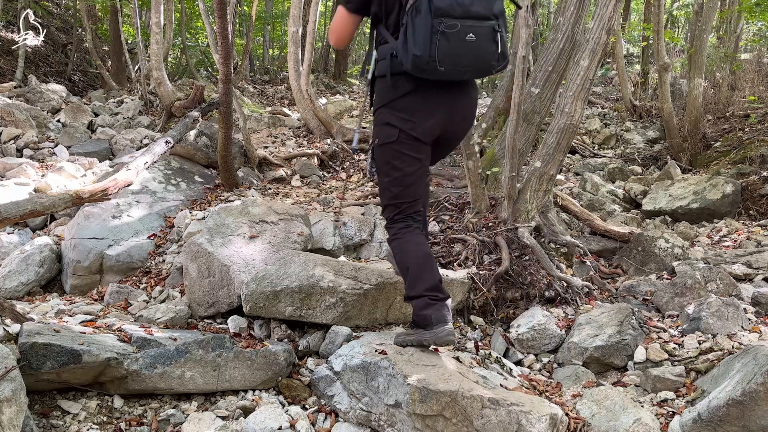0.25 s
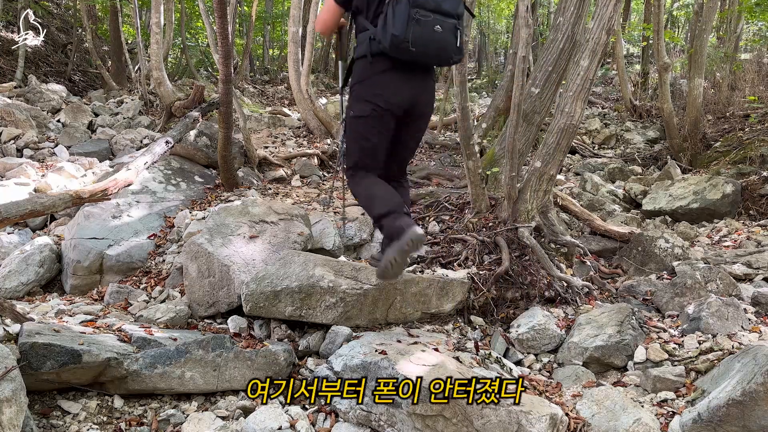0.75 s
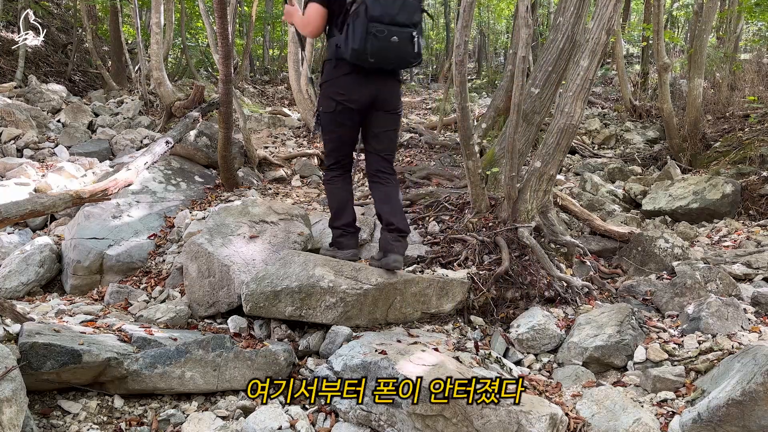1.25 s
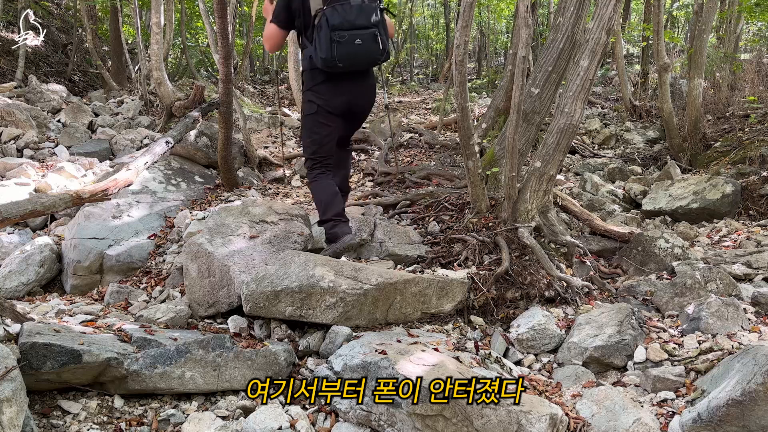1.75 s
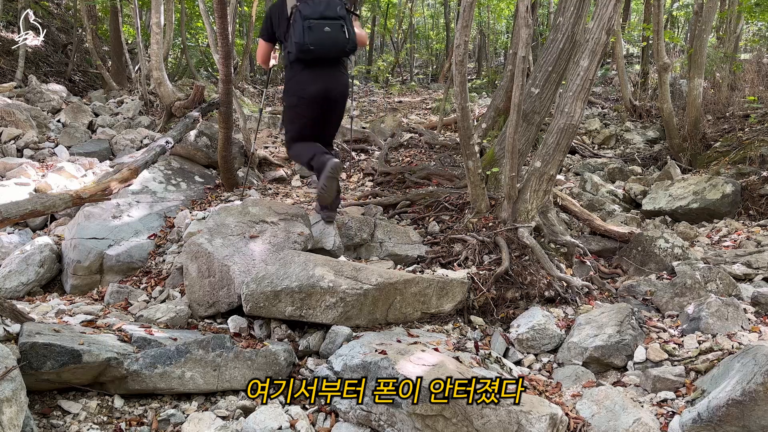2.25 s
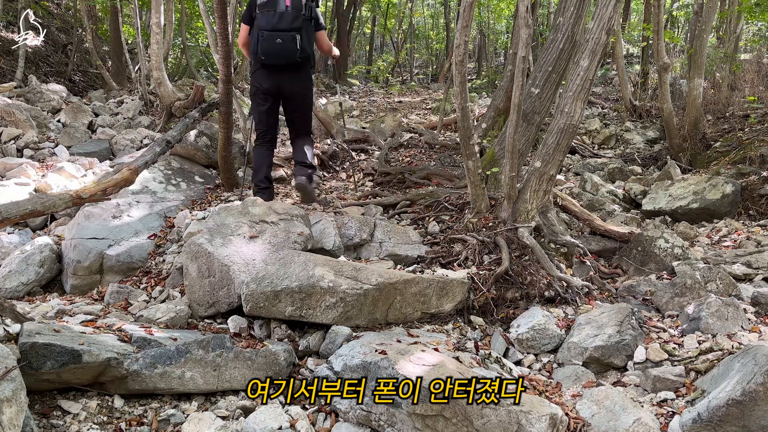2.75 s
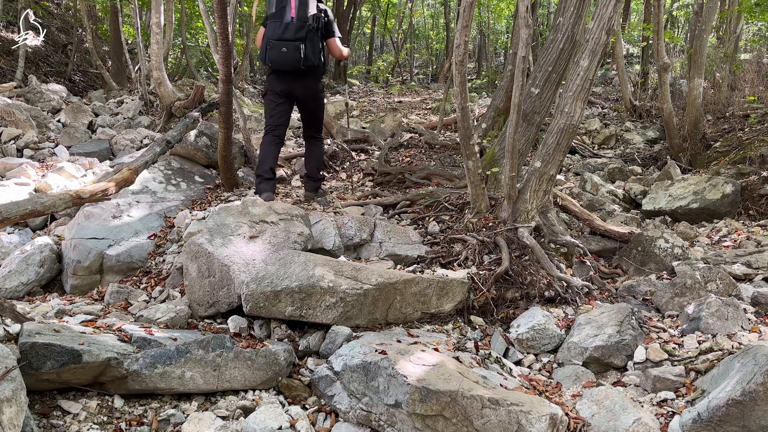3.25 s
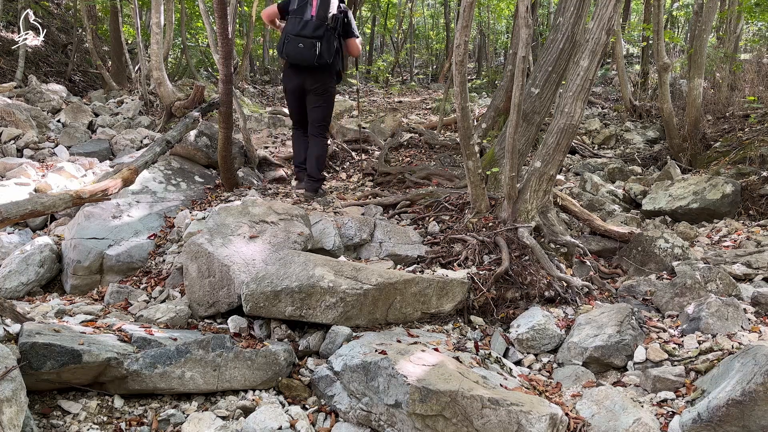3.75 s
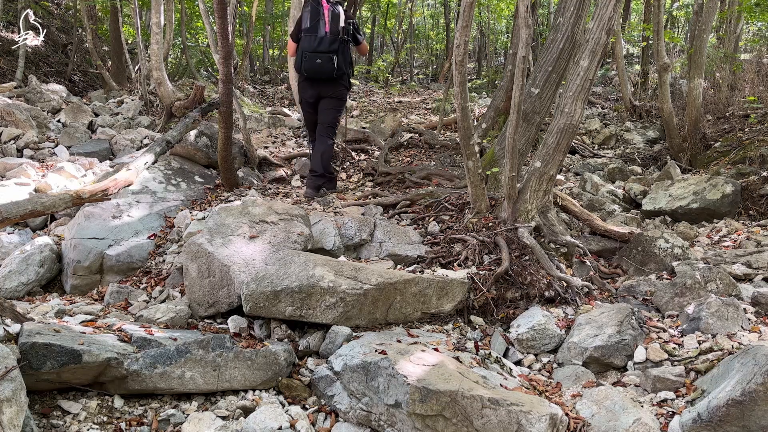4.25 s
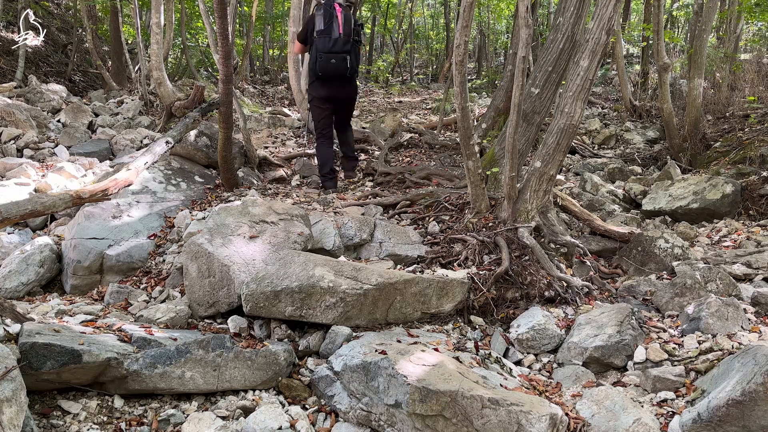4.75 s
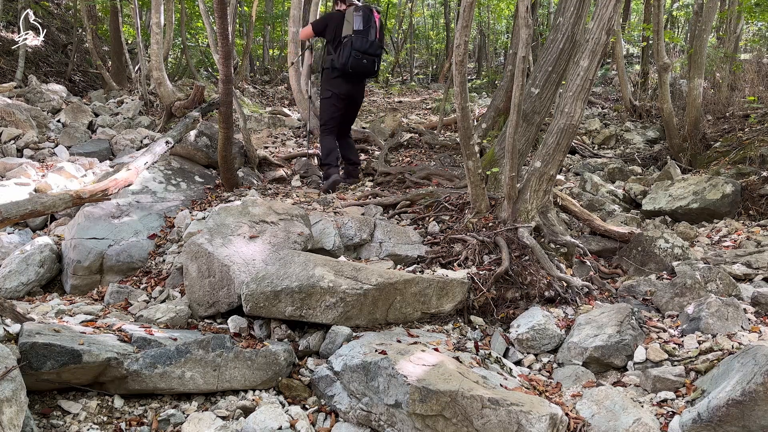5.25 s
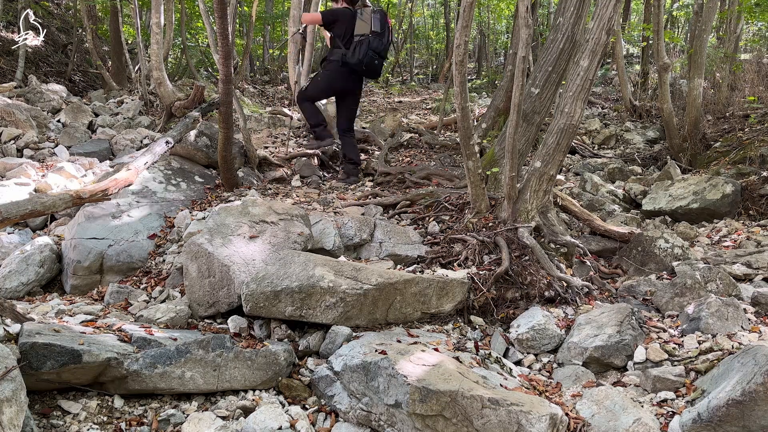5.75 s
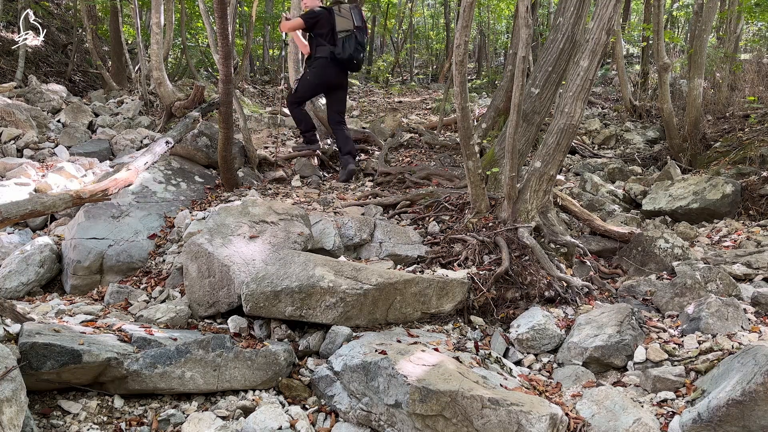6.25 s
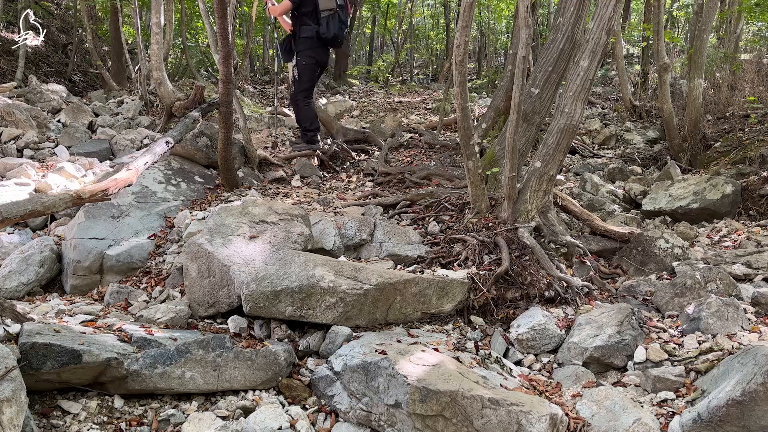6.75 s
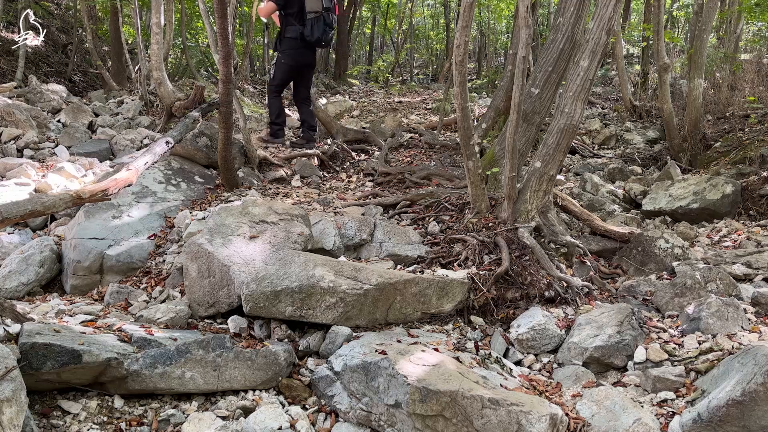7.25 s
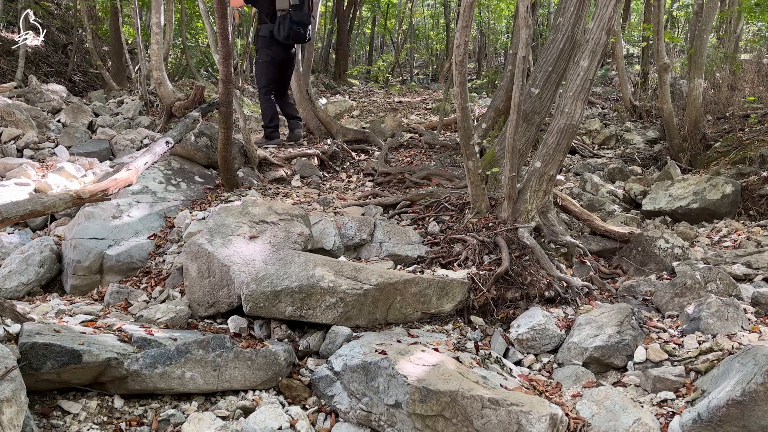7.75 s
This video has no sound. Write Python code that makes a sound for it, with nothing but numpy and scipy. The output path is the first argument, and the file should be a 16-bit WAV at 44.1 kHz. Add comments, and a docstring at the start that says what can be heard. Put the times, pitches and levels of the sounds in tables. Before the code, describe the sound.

Irregular steps on stony ground: dull boot thuds, short gritty scrapes, dry leaf rustling and small stone knocks. Metallic pole tips strike rock in bright clacks, single or in quick clusters, with a short hollow ring in the later ones. Tiny falling bird chips come from far away. The trees give a short airy tail; close stereo microphones add steady soft hiss and low rumble.

```python
"""Boots thud on stone and scuff grit and dry leaves while two trekking poles crack on loose rocks in a quiet forest.
Each crack is a noise burst that sets the hollow shaft ringing in decaying sines; thuds are falling sines with noise.
Scuffs are shaped grain noise, short noises swell in bands, pebbles tick as filtered noise, a far bird chips in slides.
Tree trunks scatter the cracks, ticks and chips into a short noise tail, over low rumble and microphone hiss.
Two close microphone ports hear it all, differing in phase and level by frequency."""
import sys
import numpy as np
from scipy import signal
from scipy.fft import rfft, irfft
from scipy.io import wavfile
from scipy.ndimage import uniform_filter1d

SR = 44100
rng = np.random.default_rng(int(sys.argv[2]) if len(sys.argv) > 2 else 0)


def wav_out(sig):
    """Save sig, one row per channel (or a flat mono array), as 16-bit PCM at SR to the path in sys.argv[1]."""
    wavfile.write(sys.argv[1], SR, np.round(np.clip(np.atleast_2d(sig).T, -1, 1) * 32767).astype(np.int16))


N = 353505  # length in samples


def amp(db):
    """Decibels to gain."""
    return 10 ** (np.asarray(db) / 20)


def rms_one(x):
    """Scale to unit rms."""
    return x / np.sqrt(np.mean(x ** 2) + 1e-20)


def at_hz(points, hz):
    """Read a table of (frequency, value) on a log-frequency axis."""
    p = np.array(points, float)
    return np.interp(np.log(hz + 1), np.log(p[:, 0] + 1), p[:, 1])


def add(out, start_s, sound):
    """Mix a sound in at a time."""
    i = round(start_s * SR)
    out[i:i + len(sound)] += sound[:N - i]


def dying(t, t60, rise_s):
    """Envelope with a short rise and an exponential fall of 60 dB in t60 seconds, 4 ms at least."""
    return amp(-60 * t / max(t60, .004)) * (1 - np.exp(-t / rise_s))


def band(x, order, edges_hz):
    """Butterworth band-pass."""
    return signal.sosfilt(signal.butter(order, edges_hz, "band", fs=SR, output="sos"), x)


def colour(x, spectrum):
    """Minimum-phase filter with the given spectrum, unit energy: nothing sounds early."""
    log_gain = np.log(amp(at_hz(spectrum, np.linspace(0, SR / 2, 2049))))
    cepstrum = irfft(log_gain)
    # Folding the cepstrum onto positive time makes the phase minimum.
    cepstrum[1:2048] *= 2
    cepstrum[2049:] = 0
    kernel = irfft(np.exp(rfft(cepstrum)))
    return signal.fftconvolve(x, kernel / np.sqrt(np.sum(kernel ** 2)))[:len(x)]


def drift(rate_hz):
    """Chance wandering with unit spread: low-passed noise, drawn every 40 samples."""
    r = np.exp(-80 * np.pi * rate_hz / SR)
    slow = signal.lfilter([1], [1, -2 * r, r * r], rng.standard_normal(N // 40 + 2002))[2000:]
    return np.interp(np.arange(N) / 40, np.arange(len(slow)), rms_one(slow))


# Pole tip on rock, levels before shaping:
# start_s, crack level_db, chatter t60_s, then level_db of the shaft's three low bending modes
POLE_BLOWS = [(1.044, -17, 0.047, -47, -50, -46.5), (2.076, -23.5, 0.045, -56, -56, -58),
              (2.1039, -16, 0.045, -68, -67, -65), (4.8208, -24, 0.11, -48.5, -48.5, -53),
              (5.4064, -19, 0.036, -47, -39.5, -42.5), (5.5151, -29, 0.13, -52, -41, -38.5),
              (5.6235, -37, 0.059, -80, -80, -71), (7.1387, -22, 0.078, -50.5, -44, -41),
              (7.1544, -22.5, 0.087, -49, -45, -49)]
# Colour of the crack: frequency_hz, relative level_db (per Hz)
CRACK_COLOUR = [(400, -2.5), (1000, -2), (2000, -5), (3600, 5), (5100, -1), (6500, 3.5), (9000, 0.5),
                (13000, -4), (16000, -2.5)]
# Low bending modes of the shaft, their strength set by the blow: pitch_hz, t60_s
SHAFT_LOW_MODES = [(279.4, 0.52), (414.6, 0.36), (621, 0.2)]
# Upper shaft modes, before chance per blow: pitch_hz, level_db (against the crack), t60_s
SHAFT_UPPER_MODES = [(793, -37, 0.1), (1008, -29, 0.17), (1850, -23, 0.082), (2570, -27, 0.053),
                     (2850, -23, 0.09), (3240, -30, .045), (3700, -36, 0.06)]
SHAFT_SHIFT = 0.022  # grip and lean detune the upper modes from blow to blow (share of pitch)


def poles():
    """The tip chatters on the rock for some milliseconds; the shaft rings on in its bending modes.
    Also returns each blow as one click of equal energy, to excite the scatter."""
    cracks, blows, rings = np.zeros(N), np.zeros(N), np.zeros(N)
    t = np.arange(SR) / SR
    noise = rng.standard_normal((len(POLE_BLOWS), 4096))
    luck = rng.standard_normal((len(POLE_BLOWS), len(SHAFT_UPPER_MODES)))
    for (start_s, crack_db, t60, *low_db), hiss, chances in zip(POLE_BLOWS, noise, luck):
        t_crack = t[:len(hiss)]
        skip = 0.64 + 0.11 * np.cos(2 * np.pi * 190 * t_crack)  # the tip rebounds every few ms
        contact = dying(t_crack, t60, 0.00057) + 1.57 * dying(t_crack, 0.0021, .0001)
        crack = amp(crack_db) * hiss * skip ** 2 * contact
        add(cracks, start_s, crack)
        add(blows, start_s, np.sqrt([np.sum(crack ** 2)]))
        modes = [(hz, db, ring_t60) for (hz, ring_t60), db in zip(SHAFT_LOW_MODES, low_db)]
        for (hz, db, ring_t60), chance in zip(SHAFT_UPPER_MODES, chances):
            modes.append((hz * (1 + SHAFT_SHIFT * chance), crack_db + db + 3.9 * chance, ring_t60))
        for hz, db, ring_t60 in modes:
            add(rings, start_s, amp(db) * np.sin(2 * np.pi * hz * t) * dying(t, ring_t60, 3.3 / hz))
    rings = rings * amp(2.5 * drift(79))  # the level flutters fast, by chance, for a rougher tone
    return colour(cracks, CRACK_COLOUR), colour(blows, CRACK_COLOUR), rings


# Boot landing its weight: start_s, level_db (of the sine, before its envelope), settling pitch_hz, t60_s
BOOT_LANDINGS = [(0.403, -30, 59, 0.18), (0.516, -31.5, 54.5, 0.12), (1.172, -31, 65.5, 0.16),
                 (1.894, -31.5, 57.6, 0.12), (2.059, -44, 70.4, 0.47), (2.14, -34, 73.4, 0.25),
                 (2.171, -30, 66.5, 0.13), (2.504, -24, 88, 0.13), (2.549, -38, 62.4, 0.2),
                 (3.041, -45.5, 76, 0.14), (3.113, -29.5, 59.4, 0.18), (3.118, -30, 93.5, 0.04),
                 (4.203, -46.5, 92, 0.1), (4.851, -33, 80.5, 0.094), (6.745, -29.5, 70.3, 0.11),
                 (6.773, -28, 60.4, 0.12), (7.285, -45, 67.6, 0.56), (7.348, -40, 66.7, 0.23),
                 (7.654, -42, 102.6, 0.14)]


def thuds():
    """The sole flattens on the rock: the pitch drops to a low wobble, roughened by shifting ground."""
    out, t = np.zeros(N), np.arange(SR // 2) / SR
    noise = rng.standard_normal((len(BOOT_LANDINGS), len(t)))
    for (start_s, db, hz, t60), hiss in zip(BOOT_LANDINGS, noise):
        pitch = hz * (1 + 1.28 * np.exp(-t / 0.0097))
        rough = rms_one(band(hiss, 2, [hz * .5, hz * 2.4]))
        push = np.sin(2 * np.pi * np.cumsum(pitch) / SR) + 0.55 * rough
        add(out, start_s, amp(db) * push * dying(t, t60, 0.0079))
    return out


def grains(spectrum, per_s, spread_db, flutter_db, cycles, hiss):
    """Breaks of uneven size, each ringing some cycles at its own pitch, over a hiss of sliding, in clumps."""
    size = amp(spread_db * np.minimum(rng.exponential(1, N), 4)) * rng.choice([-1, 1], N)
    clicks = size * (rng.random(N) < per_s / SR) + 1e-18
    dealt = rng.integers(0, 16, N)  # which of 16 pitches each break rings at
    breaks = 0
    for k, hz in enumerate(np.geomspace(spectrum[0][0], spectrum[-1][0], 16)):
        r = amp(-60 * hz / (cycles * SR))
        w = 2 * np.pi * hz / SR
        ringing = signal.lfilter([1, 0, -1], [1, -2 * r * np.cos(w), r * r], clicks * (dealt == k))
        breaks = breaks + np.sqrt(hz) * rms_one(ringing)
    ground = colour(rms_one(breaks) + hiss * rng.standard_normal(N), spectrum)
    return rms_one(ground * amp(flutter_db * drift(21.5)))


# Colours of the ground, three tables alike: frequency_hz, relative level_db (per Hz)
GRIT_COLOUR = [(900, -12.5), (1800, -5), (3000, -1), (5000, -3), (7000, -8), (9000, -3.5), (12000, -10)]
LEAF_COLOUR = [(4000, -22), (7000, -6), (8500, -6.5), (10000, -8.5), (13000, -5.5), (16000, -13)]
STONE_COLOUR = [(60, 9.5), (150, -8), (400, 1.5), (1000, -4.5), (2000, -10), (4000, -44.5)]
# A boot drags through the litter:
# start_s, length_s, grit scuff level_db, fine leaf rustle level_db, grinding stones level_db
BOOT_DRAGS = [(-.04, 0.14, -58.5, -60, -61.5), (0.066, 0.56, -66, -68.5, -63.5),
              (0.388, 0.06, -57.5, -56, -51.5), (0.59, 0.056, -82, -72, -66),
              (0.762, 0.27, -65, -62.5, -67), (1.164, 0.088, -57.5, -56.5, -64.5),
              (1.308, 0.1, -64, -62, -67.5), (1.587, 0.39, -74.5, -75, -69.5),
              (1.924, 0.11, -59, -64.5, -53), (2.075, 0.013, -40, -70, -43.5),
              (2.242, 0.23, -60.5, -64, -60), (2.491, 0.065, -48.5, -52, -49), (2.768, 0.1, -64, -57, -71),
              (2.934, 0.17, -69.5, -64, -61.5), (3.046, 0.096, -58, -55.5, -75),
              (3.212, 0.035, -61, -57.5, -54), (3.644, 0.022, -70, -66, -71), (4.132, 0.12, -58, -52, -59),
              (4.297, 0.21, -61.5, -59, -64.5), (4.598, 0.013, -67, -58, -64),
              (4.93, 0.28, -72.5, -61.5, -66.5), (5.09, 0.24, -62, -61, -69),
              (5.526, 0.11, -59.5, -65, -61.5), (5.855, 0.45, -73, -62.5, -73.5),
              (6.137, 0.26, -65, -59, -67), (6.343, 0.22, -64.5, -58, -72.5),
              (6.733, 0.018, -52, -46.5, -50.5), (6.892, 0.011, -75, -52, -62),
              (7.114, 0.1, -53, -77, -56.5), (7.392, 0.22, -67.5, -60.5, -72),
              (7.878, 0.051, -74.5, -61.5, -75)]
# The sole bears down, slower in long drags (share of length); the litter settles after it lifts.
DRAG_ATTACK_S, DRAG_SWELL, DRAG_RELEASE_DB_PER_S = 0.021, .25, 112


def scuffing():
    """Each drag presses, holds and lets go; it stirs grit, leaves and stones in its own proportion."""
    start_s, length_s, *levels = np.transpose(BOOT_DRAGS)
    length_s = length_s[:, None]
    coarse = np.arange(0, N, 64)
    since = coarse / SR - start_s[:, None]
    bear_down = np.clip(since / (DRAG_ATTACK_S + DRAG_SWELL * length_s), 0, 1)
    press = bear_down * amp(-DRAG_RELEASE_DB_PER_S * np.maximum(since - length_s, 0))
    # Overlapping drags add in power.
    grit, leaves, stones = [np.interp(np.arange(N), coarse, np.sqrt(amp(db) ** 2 @ press ** 2))
                            for db in levels]
    return (grit * grains(GRIT_COLOUR, 3000, spread_db=2.0, flutter_db=2.0, cycles=24, hiss=1.0)
            + leaves * grains(LEAF_COLOUR, 5000, spread_db=3.5, flutter_db=3.0, cycles=42, hiss=1.0)
            + stones * grains(STONE_COLOUR, 1500, spread_db=1.5, flutter_db=2.5, cycles=11.7, hiss=0.88))


# Short swelling noises: broad ones like sole scrapes, narrow ones whistly, of unknown source.
# start_s, level_db (before the envelope), centre_hz, width_octaves, length_s
SHORT_SCRAPES = [(0.26, -65, 4530, 0.6, 0.037), (0.395, -43.5, 3600, 1.05, 0.011),
                 (0.471, -57, 2950, 1.9, 0.043), (0.841, -59.5, 2260, 1.9, 0.095),
                 (1.291, -59.5, 1860, 1.5, 0.19), (2.495, -37, 3480, 3, 0.042),
                 (2.781, -54.5, 3100, 3.6, 0.054), (4.451, -45, 8200, 5.8, 0.045),
                 (6.365, -59, 3380, 0.52, .04), (6.435, -62, 3240, 0.23, 0.044),
                 (6.486, -51, 3340, 0.25, 0.011), (6.494, -60, 3200, 0.3, 0.063),
                 (3.145, -61.5, 5200, 0.4, 0.036), (6.471, -62, 5030, 0.17, 0.16),
                 (6.555, -51.5, 4400, 2.5, 0.061), (6.729, -52.5, 5900, 1.4, 0.09),
                 (7.108, -43, 4960, 3.7, 0.084)]


def short_scrapes():
    """Uneven noise that swells and stops inside its own band: broad bands scrape, narrow ones whistle."""
    out, t = np.zeros(N), np.arange(SR // 2) / SR
    shape = (len(SHORT_SCRAPES), len(t))
    noise = rng.standard_normal(shape) * amp(4.6 * np.minimum(rng.exponential(1, shape), 4))
    for (start_s, db, hz, octaves, length_s), rough in zip(SHORT_SCRAPES, noise):
        edges = np.clip(hz * 2 ** (np.array([-.5, .5]) * max(octaves, .1)), 100, 19000)
        banded = rms_one(band(rough, 2, edges))
        swell = 1 - np.exp(-t / (0.084 * length_s))
        add(out, start_s, amp(db) * banded * np.exp(-(t / length_s) ** 3) * swell)
    return out * amp(1.33 * drift(98))


# Pebbles and twigs: start_s, level_db (loudest 2 ms), pitch_hz, t60_s
PEBBLE_TICKS = [(0.398, -33.5, 490, 0.027), (0.491, -48.5, 517, 0.082), (0.633, -57, 900, 0.024),
                (1.163, -48, 500, 0.058), (1.893, -50, 760, 0.033), (2.058, -28.5, 490, 0.023),
                (2.161, -43, 820, 0.035), (2.396, -47.5, 1740, 0.04), (2.438, -52, 1700, 0.028),
                (2.463, -53, 1900, 0.048), (2.503, -30, 730, 0.049), (2.516, -30.5, 535, 0.051),
                (2.839, -55, 3280, 0.065), (3.033, -46.5, 770, 0.029), (3.093, -48, 740, 0.092),
                (3.114, -43, 1050, 0.025), (3.287, -48, 6920, 0.013), (3.31, -52, 6460, 0.015),
                (3.346, -52, 9200, 0.015), (4.152, -54, 575, 0.033), (4.221, -49, 586, 0.032),
                (4.461, -52, 5600, 0.017), (5.147, -45.5, 2400, 0.022), (5.315, -57, 6790, 0.016),
                (5.383, -38, 10000, 0.012), (5.595, -54, 900, 0.088), (2.08, -28, 3500, 0.022),
                (4.483, -47, 6030, 0.0087), (6.208, -45.5, 2100, 0.032), (6.529, -47, 5100, 0.0061),
                (6.765, -40.5, 4000, 0.019), (6.8, -45, 640, 0.012), (6.882, -64, 1070, 0.025),
                (6.919, -41, 3180, 0.0065), (5.225, -56, 1100, .02), (6.78, -45, 895, .015),
                (7.242, -49.5, 4360, 0.027), (7.288, -56, 900, 0.018), (7.358, -56, 347, 0.035),
                (7.659, -43.5, 3570, 0.02)]


def ticks():
    """A pebble or twig gives a short noisy knock around its own pitch."""
    out, t = np.zeros(N), np.arange(4096) / SR
    noise = rng.standard_normal((len(PEBBLE_TICKS), len(t)))
    for (start_s, db, hz, t60), hiss in zip(PEBBLE_TICKS, noise):
        # a sharp first contact over the rattle
        contact = dying(t, t60, 0.00066) + 0.48 * dying(t, 0.0032, .0001)
        knock = band(hiss * contact, 3, [hz * 0.266, min(hz * 1.95, .45 * SR)])
        loudest = np.sqrt(np.max(uniform_filter1d(knock ** 2, size=88)))
        add(out, start_s, amp(db) * knock / loudest)
    return out


# A small bird's falling chip: start_s, level_db (before the mix), starting pitch_hz of the fundamental
BIRD_CHIPS = [(2.402, -56, 3520), (3.224, -49, 3610), (3.388, -51.5, 3460), (5.265, -48, 3630),
              (6.573, -49.5, 3570), (6.934, -52, 3550)]


def bird():
    """Each chip slides down within 15 ms; the octave is stronger than the fundamental."""
    out, t = np.zeros(N), np.arange(2048) / SR
    progress = np.clip(t / 0.015, 0, 1)
    shape = np.sqrt(np.sin(np.pi * progress) + 1e-9)
    for start_s, db, hz in BIRD_CHIPS:
        phase = 2 * np.pi * np.cumsum(hz * (1 - 0.275 * progress ** 2.22)) / SR
        add(out, start_s, amp(db) * shape * (np.sin(2 * phase) + 0.15 * np.sin(phase)))
    return out


TRUNKS_DB, TRUNKS_T60_S, TRUNKS_HZ = -7.5, 0.46, (1600, 8800)  # level, decay, band edges


def trunks(x):
    """Scatter from many trunks: a noise tail that dies away."""
    t = np.arange(SR) / SR
    tail = rng.standard_normal(SR) * dying(t, TRUNKS_T60_S, 0.00053)
    tail = band(tail, 1, TRUNKS_HZ)
    return amp(TRUNKS_DB) * signal.fftconvolve(x, tail / np.sqrt(np.sum(tail ** 2)))[:N]


# Low rumble plus microphone hiss with a bump near 8.5 kHz: frequency_hz, relative level_db (per Hz)
FLOOR_COLOUR = [(25, -21.5), (45, 2.5), (65, 2.5), (120, -5), (400, -13.5), (1200, -22.5), (4500, -31),
                (7000, -18), (8500, -7.5), (11000, -29), (16000, -33)]
FLOOR_DB = -61


def background_noise():
    """Steady low rumble plus microphone hiss: coloured noise whose level drifts very slightly."""
    return amp(FLOOR_DB + 0.094 * drift(1.3)) * colour(rng.standard_normal(N), FLOOR_COLOUR)


def spread(hits, chips):
    """The part that differs between the ports; each call is an unrelated draw."""
    scatter = trunks(hits + amp(10) * chips)  # the far bird is mostly scatter
    return scuffing() + short_scrapes() + background_noise() + scatter


# Likeness of the diffuse field at the two ports: frequency_hz, common share (0 to 1)
PORT_LIKENESS = [(60, 0.97), (200, 0.6), (500, 0.78), (1300, 0.09), (2200, 0.92), (4000, 0.5), (6500, 0.29),
                 (8000, 1), (14000, 0.92)]


def scene():
    """Direct hits plus a diffuse field that is partly common to both ports."""
    (cracks, blows, rings), pebbles, chips = poles(), ticks(), bird()
    direct = rfft(cracks + rings + pebbles + thuds() + amp(-1) * chips)
    alike = np.clip(at_hz(PORT_LIKENESS, np.arange(len(direct)) * SR / N), 0, 1)
    common = np.sqrt((1 + alike) / 2) * rfft(spread(blows + pebbles, chips))
    apart = np.sqrt((1 - alike) / 2) * rfft(spread(blows + pebbles, chips))
    return irfft([direct + common + apart, direct + common - apart], N)


# Phase between the microphone ports: frequency_hz, left port's lead_rad
PHASE_LEAD = [(0, 0), (1500, .4), (2000, .1), (3360, 1.2), (4900, .5), (5700, -.8), (6300, -1),
              (7670, -2.6), (8400, -3.14), (8900, -3.6), (11100, -6.1), (12500, -6.4), (15200, -9.4),
              (16100, -9.3)]
# Level between the microphone ports: frequency_hz, left over right level_db
LEVEL_BALANCE = [(300, 0), (1000, .7), (2000, 1.5), (3300, 3), (5500, 3.8), (8000, 0), (15000, 0)]
STOPBAND_EDGE_HZ = 16583  # 70 dB down from here up


def record(dry):
    """The two ports differ in phase and level by frequency; the top is cut."""
    hz = np.arange(N // 2 + 1) * SR / N
    # Half of each difference goes to the left port, the inverse to the right.
    left = amp(at_hz(LEVEL_BALANCE, hz) / 2) * np.exp(.5j * np.interp(hz, *np.transpose(PHASE_LEAD)))
    ports = irfft(rfft(dry) * [left, 1 / left], N)
    # The microphones shed deep bass.
    ports = signal.sosfilt(signal.butter(2, 42, "high", fs=SR, output="sos"), ports)
    return signal.sosfilt(signal.cheby2(12, 70, STOPBAND_EDGE_HZ, fs=SR, output="sos"), ports)


dry = scene()
out = record(dry)
wav_out(out)
```